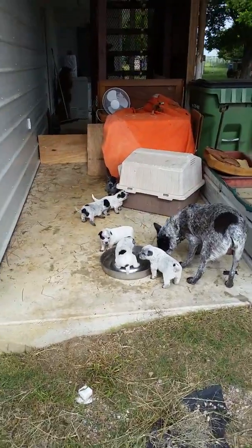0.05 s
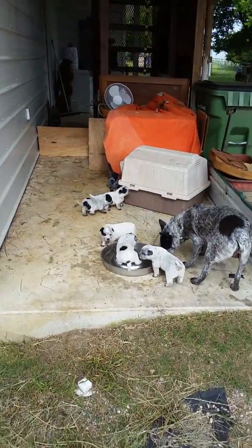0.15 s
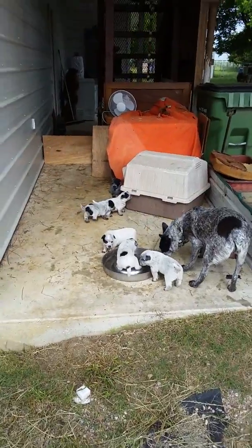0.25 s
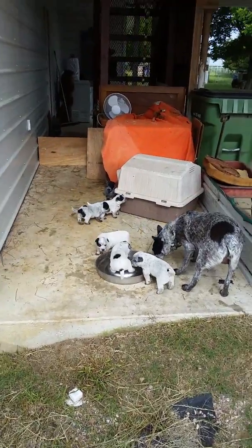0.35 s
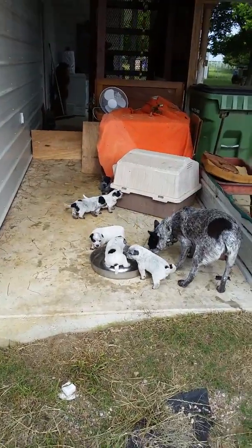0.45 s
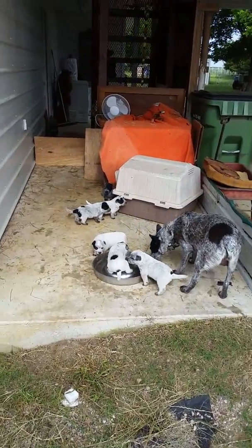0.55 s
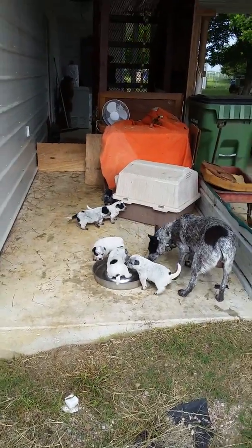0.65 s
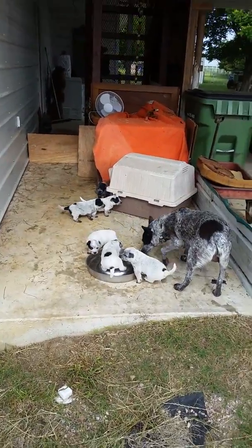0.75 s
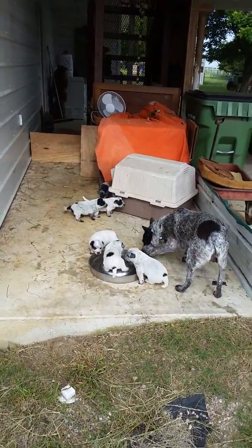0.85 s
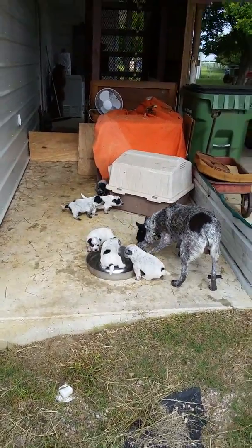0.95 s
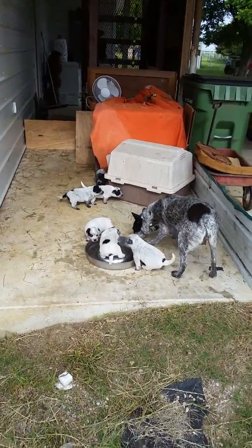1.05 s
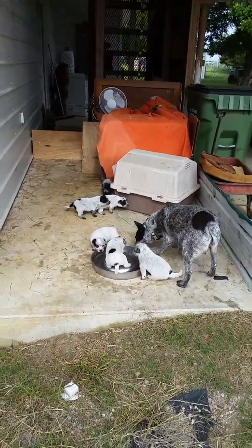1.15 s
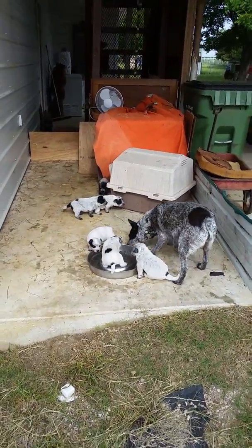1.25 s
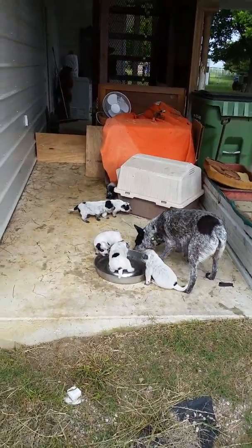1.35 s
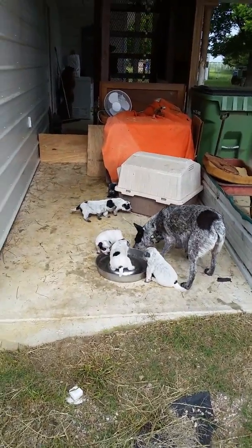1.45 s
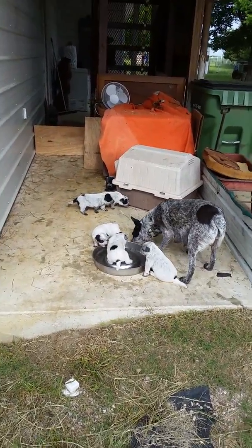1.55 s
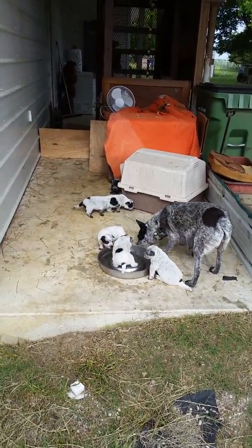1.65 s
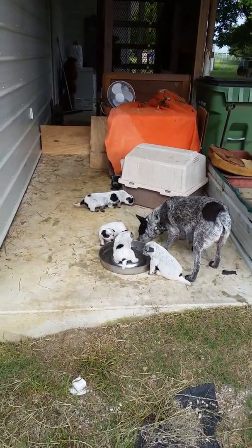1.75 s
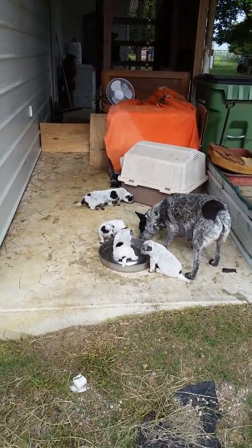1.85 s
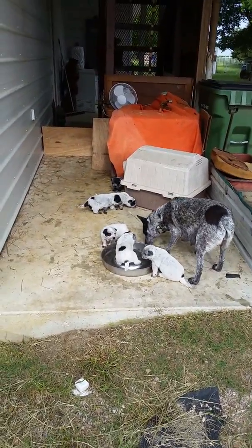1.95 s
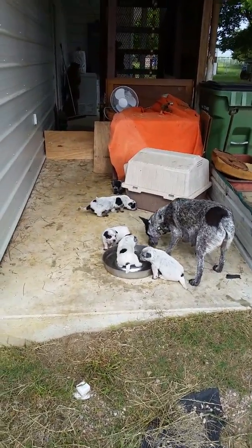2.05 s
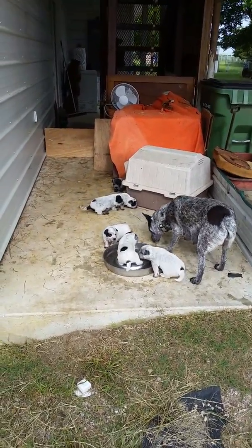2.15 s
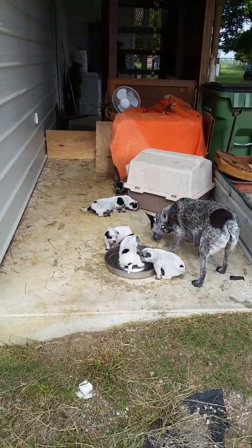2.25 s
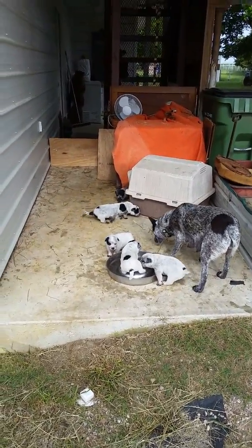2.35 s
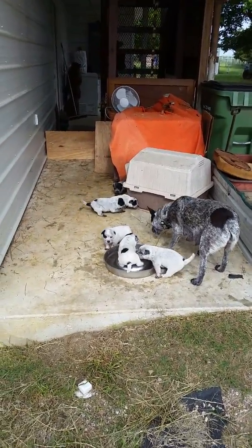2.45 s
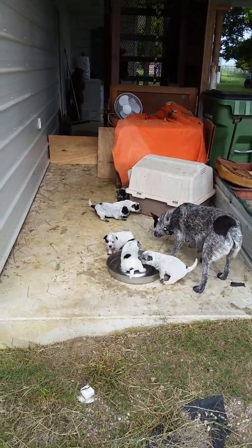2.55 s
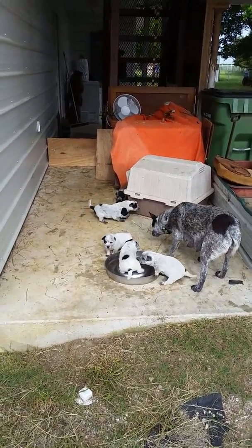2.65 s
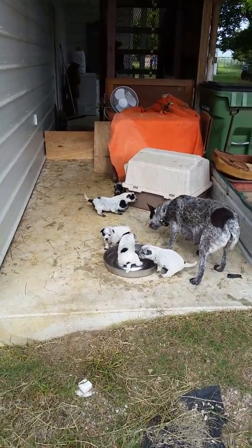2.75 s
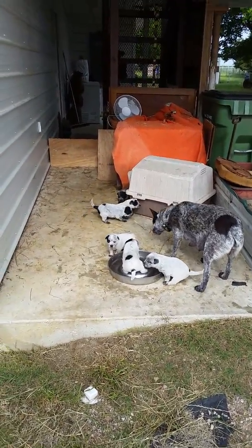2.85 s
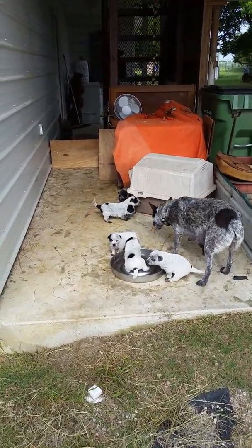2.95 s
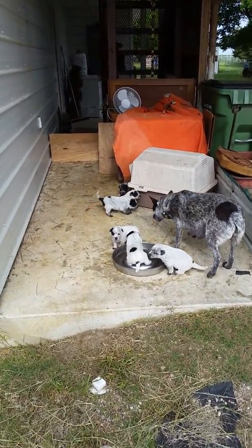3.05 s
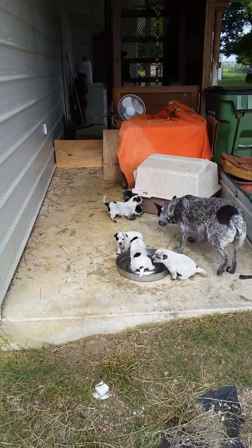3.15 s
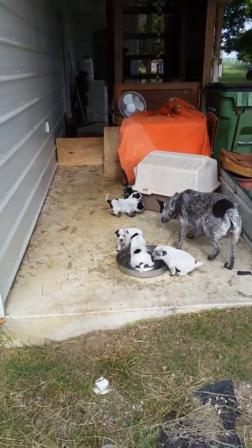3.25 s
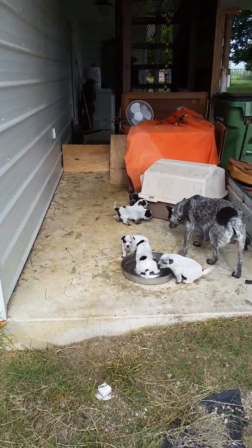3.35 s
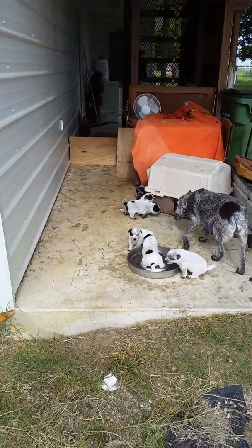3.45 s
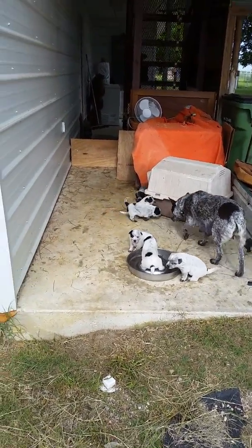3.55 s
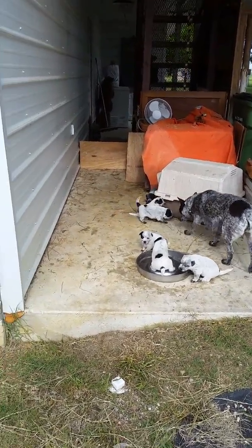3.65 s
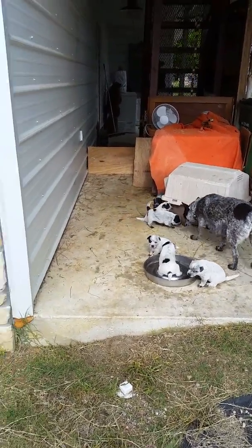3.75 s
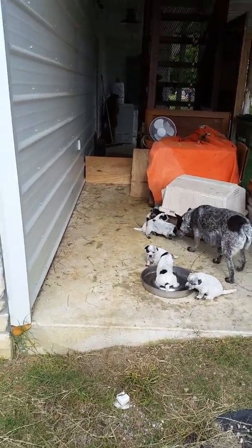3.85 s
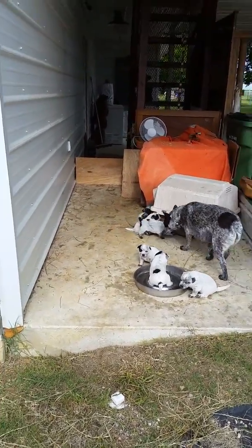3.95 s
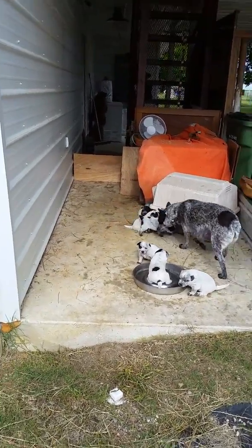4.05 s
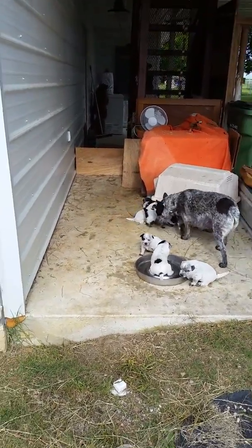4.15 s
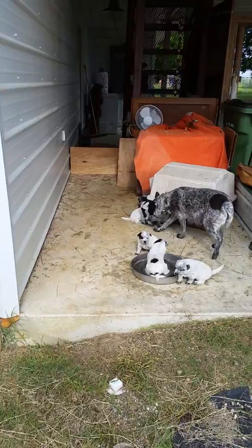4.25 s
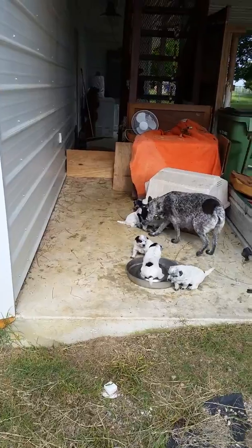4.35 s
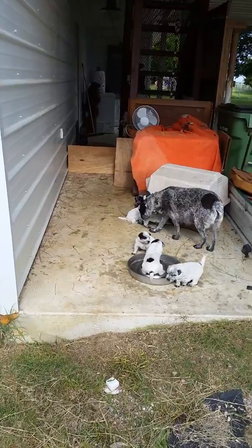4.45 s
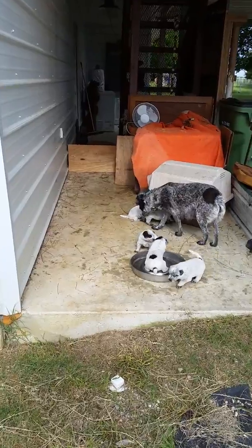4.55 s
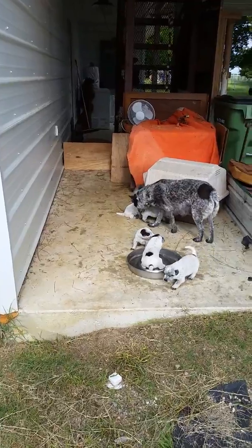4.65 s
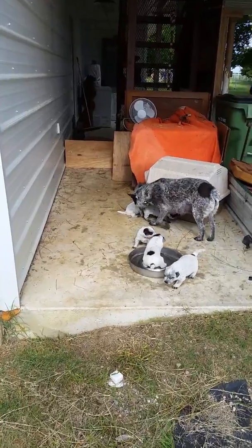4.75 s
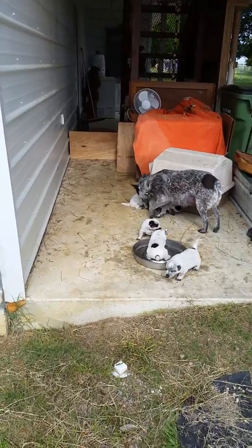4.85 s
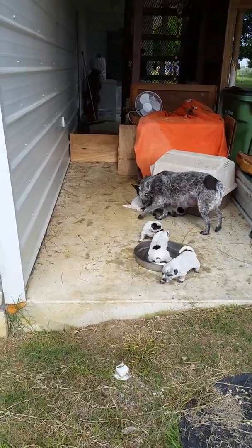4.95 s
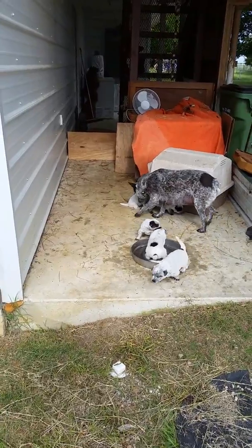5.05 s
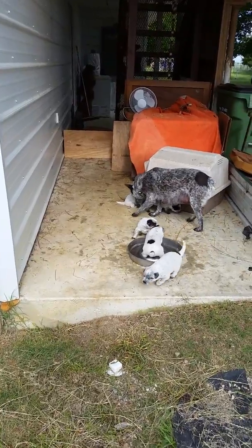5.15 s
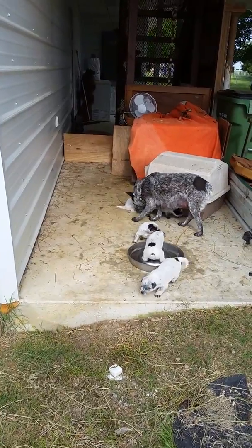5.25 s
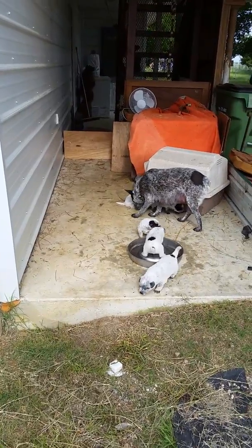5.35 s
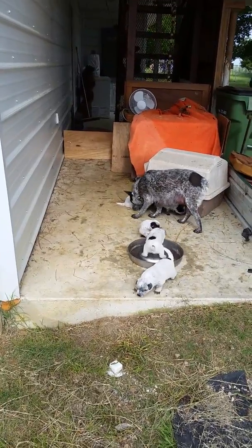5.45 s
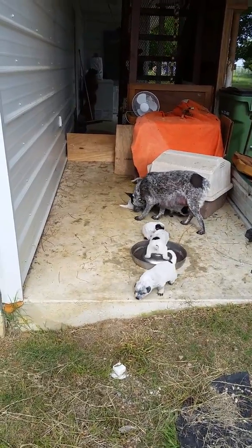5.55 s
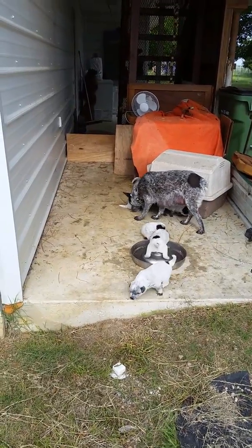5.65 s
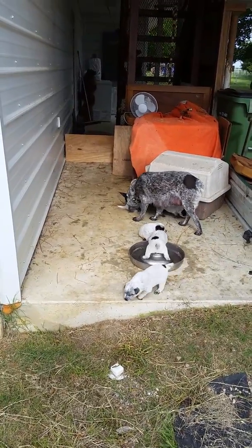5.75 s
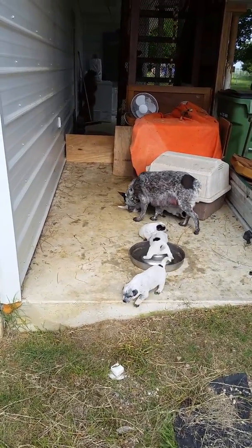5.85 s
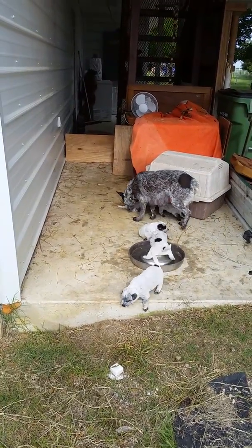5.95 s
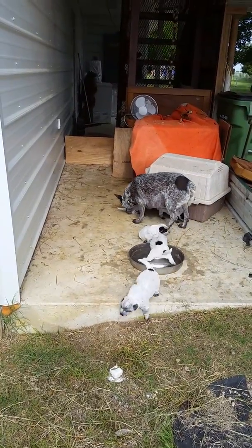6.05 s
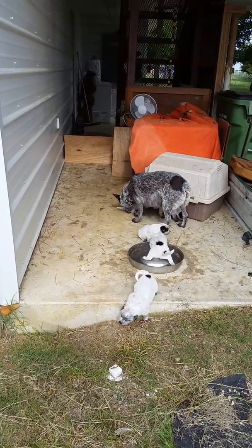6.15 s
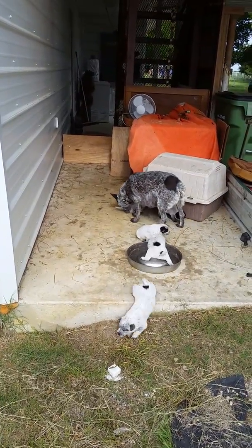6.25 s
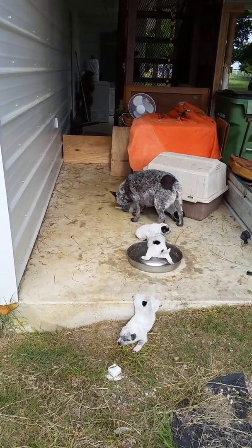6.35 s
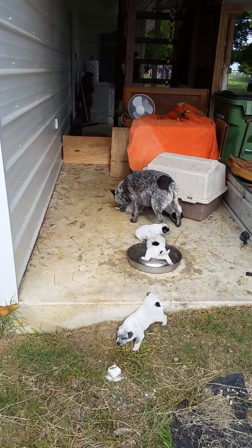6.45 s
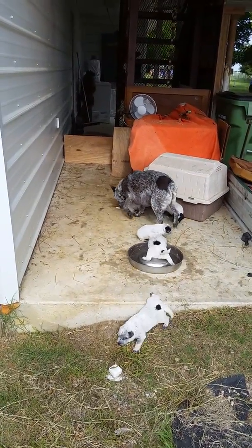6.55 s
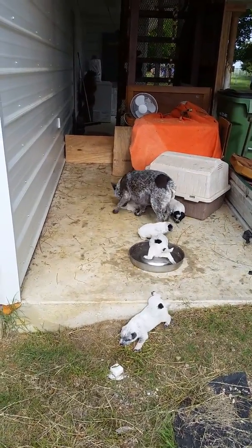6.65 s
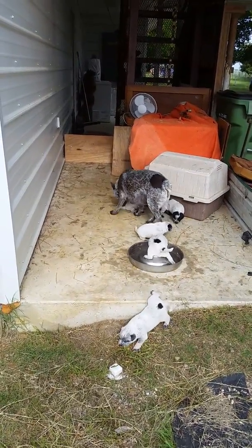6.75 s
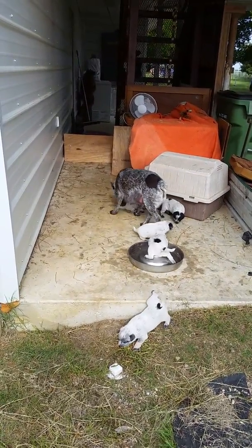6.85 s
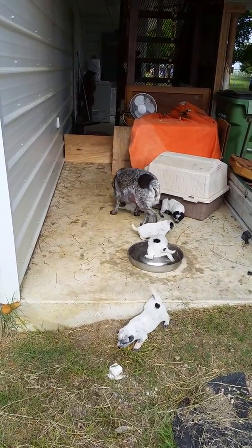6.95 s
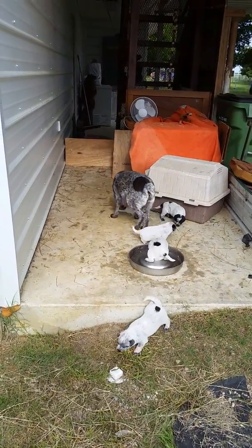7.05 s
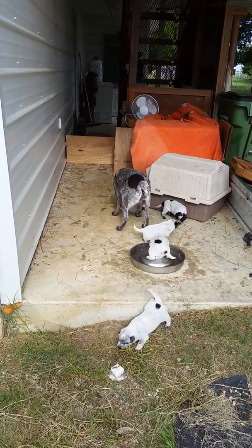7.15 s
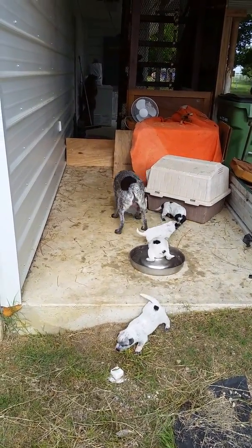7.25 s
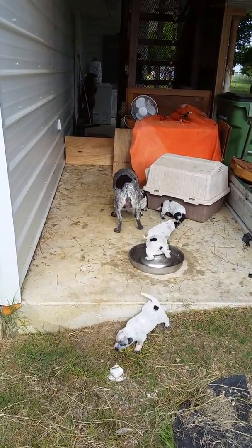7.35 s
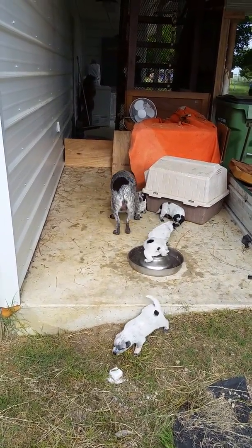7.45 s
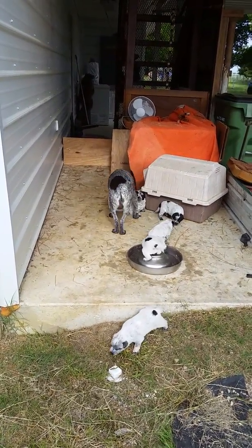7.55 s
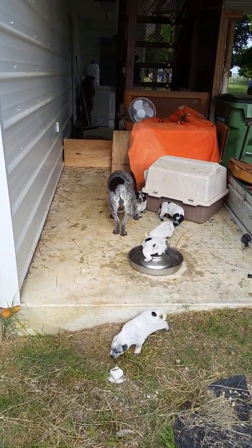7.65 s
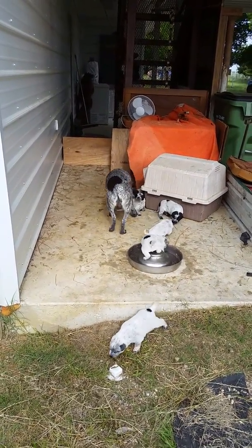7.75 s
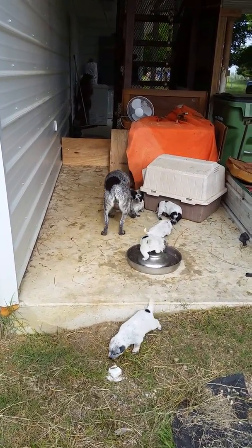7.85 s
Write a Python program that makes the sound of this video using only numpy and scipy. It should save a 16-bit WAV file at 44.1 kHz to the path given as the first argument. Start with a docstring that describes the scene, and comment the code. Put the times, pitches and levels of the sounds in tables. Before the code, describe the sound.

Quiet breeze and faint microphone ticks open the scene, with a raspy bird chirp outside. A puppy whistles thinly, breaking to a lower note, then whimpers repeatedly in short nasal cries. Around the middle, fingers slip across the handheld microphone in a dull, accelerating rub. Afterwards come tiny grunts, faint distant bird slurs, low murmurs of a pan under paws, and one soft pan thud, with short shed echoes.

```python
"""Puppies and a pan in an open shed

Close by, puppies give a thin nasal whistle, arching whimpers and small grunts, all built of gliding harmonics,
and a metal pan bumps softly as decaying low modes. Outside, birds chirp as shaky tones in a light breeze of
coloured noise. The hand on the microphone makes its case tick by short pulses, then slips across it in a loud
juddering rub of pulse trains and friction noise. The right port is shaded and hears little treble through the air.
"""
import sys
import numpy as np
from scipy import signal
from scipy.fft import rfft, irfft, next_fast_len
from scipy.io import wavfile
from scipy.ndimage import uniform_filter1d

SR = 44100
rng = np.random.default_rng(int(sys.argv[2]) if len(sys.argv) > 2 else 0)


def inscribe(sig):
    """Save sig as 16-bit PCM at rate SR to the path in sys.argv[1].

    A 1-D sig is mono; a 2-D sig holds one channel per row.
    Samples are clipped to [-1, 1] before scaling.
    """
    pcm = np.round(np.clip(np.atleast_2d(sig).T, -1, 1) * 32767)
    wavfile.write(sys.argv[1], SR, pcm.astype(np.int16))


N = 348037
TIME = np.arange(N) / SR
CUTOFF_HZ = 15900

# Moving air at the ports, rustling leaves, and a far hiss round 5 kHz that rises and falls with the rush.
# Each row: frequency in Hz, level in dB.
AIR_COLOUR = [(15, -49), (25, -7.5), (54, -3.5), (98, -4.5), (199, -13), (233, -11.5), (284, -11.5),
              (366, -3.5), (493, -9), (589, -13), (856, -17.5), (964, -33), (1270, -16.5), (1780, -26),
              (2800, -38.5), (3640, -68.5), (6160, -120)]
LEAF_COLOUR = [(2000, -2), (2700, -4), (3600, -14.5), (4500, 1.5), (5600, -5), (6700, 4.5), (7400, -9),
               (8200, -39), (10500, -26), (12000, -12.5), (15500, -13.5)]
HISS_COLOUR = [(3000, -17), (4000, -16.5), (4600, -3.5), (5000, -2.5), (5600, -13.5), (6500, -31.5)]
# Swells of the background: rush, low buffeting and rustle rise and fall together. Each row: centre in seconds,
# half-width in seconds (to 1/e), lift of the rush in dB, lift of the low buffeting in dB, lift of the rustle in dB.
SWELLS = [(0.03, 0.21, 7, 3.5, 0), (0.36, 0.13, 5, 1.5, 7.5), (1.1, 0.15, 5, 2, 1.5),
          (1.82, 0.27, 10.5, 5.5, 5.5), (2.7, 0.33, 4, 2.5, 8), (3.851, 0.85, 9, 4, 11.5),
          (4.9, 0.52, 9.5, 6.5, 20.5), (5.95, 0.28, 4, 5, 14), (6.54, 0.25, 7.5, 8.5, 14),
          (6.85, 0.16, 9.5, 8.5, 11), (7.21, .2, 6.5, 7, 11.5)]
# Right port against the left, for the breeze and for other sound through the air. Each row: Hz, gain in dB.
BREEZE_RIGHT_PORT = [(60, 0.5), (300, 6.5), (800, -7.5), (1400, -12.5), (2500, -7.5), (4700, -18.5),
                     (6700, -20.5), (8500, -2), (14000, -4)]
AIRBORNE_RIGHT_PORT = [(200, -5), (900, -6), (2000, -10), (3500, -12), (4500, -33), (6000, -36),
                       (8500, -28.5), (12000, -13), (15000, -10.5)]

# Strokes of the finger across the case, a light one and then the long rub. Each row: full pressure reached
# in seconds, hold in seconds, judder in dB, friction in dB.
STROKES = [(0.003, 0.093, -78, -61), (4.554, .005, -38, -50), (4.707, 0.0087, -20.5, -23.5),
           (4.793, 0.04, -18, -23), (4.858, .03, -33, -34), (4.927, 0.012, -45, -37.5)]
PRESS_DB_PER_S, LIFT_DB_PER_S = 242, 456   # each stroke builds up and lets go
BRUSH_DB, BRUSH_FADE_DB_PER_S = -21, 82   # the skin still brushes the case after a stroke
# The finger gathers speed: start and end of the change in seconds; slips per second before and after it.
SPEED_UP_S = (4.66, 4.82)
SLIPS_PER_S = (62, 370)
# Friction through the case, and the fine hiss of skin each port picks up by itself. Each row: Hz, level in dB.
FRICTION_COLOUR = [(30, -14), (110, 10), (330, 1), (520, 15.5), (740, -0.5), (900, 2), (1200, -8.5),
                   (1500, -14), (1950, -24.5), (2300, -39.5), (4000, -42.5), (8000, -67)]
SKIN_COLOUR = [(100, 6.5), (1200, 3.5), (2000, -14.5), (2500, -17.5), (4000, -22.5), (6700, -28.5),
               (8200, -67), (10500, -47.5), (12000, -38.5), (15500, -39)]
# Left port against the right, for sound through the case. Each row: frequency in Hz, gain in dB.
CASE_LEFT_PORT = [(60, -6), (150, -14.5), (300, -8.5), (700, -0.5), (1290, 3.5), (2400, -17.5), (5000, 7),
                  (15000, -6.5)]
PORT_LAG_S = .0009

# Slips of the finger on the case, light ticks of the case, and dull low buffets leaning to one port or the other.
# Each row: time in seconds, strength in dB, left-over-right lean in dB (ahead of the left port's own response).
SLIPS = [(0.335, -40.5, -6.5), (1.037, -34.5, -2), (3.52, -28.5, -1.5), (3.758, -38.5, -6), (3.809, -36, 0),
         (3.9, -34.5, -3.5), (3.917, -31, -4.5), (4.166, -29, -6), (4.249, -20.5, -9), (4.274, -25, -6.5),
         (4.369, -23, -16.5), (4.382, -17.5, -1), (4.523, -22, 0.5), (4.62, -13.5, 4.5), (4.642, -11, 2),
         (4.665, -18.5, -3.5), (4.734, -16, -11), (4.84, -17, -18), (6.825, -36, -4), (6.859, -34.5, -1)]
TICKS = [(0.401, -45, -3.5), (0.573, -40, -1.5), (0.878, -48, -2.5), (1.016, -43.5, -3), (1.194, -45, -9),
         (1.256, -50, -9), (1.349, -47.5, -3.5), (1.487, -44.5, -1.5), (1.661, -39, 0), (1.816, -46, -2),
         (2.41, -47, -2.5), (2.551, -49, 0), (3.949, -30.5, -10.5)]
BUFFETS = [(3.519, -35, 14.5), (4.686, -28, -20), (6.152, -41, -7), (6.293, -39.5, 7), (6.425, -38.5, -9),
           (6.46, -43.5, 5), (6.502, -36.5, 8), (6.575, -46.5, 21), (6.675, -41, -10), (6.762, -40, 7)]
# Their colours. Each row: frequency in Hz, level in dB.
SLIP_COLOUR = [(25, -19), (70, 4.5), (140, 12.5), (320, 8), (550, 0), (800, -18), (1250, -31),
               (1550, -22.5), (2000, -62), (3500, -57), (9000, -77)]
TICK_COLOUR = [(30, -78.5), (120, 24), (300, 19.5), (600, 21), (900, -7.5), (1300, -1.5), (1800, -0.5),
               (3000, -51), (8000, -86)]
BUFFET_COLOUR = [(20, -10.5), (55, 8), (100, 3), (160, -7.5), (300, -19), (1000, -60), (4000, -86.5)]

# A bird's harsh falling chirp. Each row: start in seconds, level in dB.
CHIRPS = [(0.955, -51.5), (2.552, -52.5), (4.296, -46), (6.763, -48)]
# Course of one chirp. Each row: seconds after its start, pitch in Hz, relative level in dB.
CHIRP_COURSE = [(0, 4800, -26.5), (0.016, 4527, -9.5), (.04, 3923, -7), (0.058, 3422, -4.5),
                (.085, 3200, -7.5), (.102, 3006, -11), (0.113, 2634, -17.5)]
# Rasping strands of a chirp. Each row: multiple of the pitch, relative level in dB.
CHIRP_STRANDS = [(0.998, 0), (1.15, -4), (1.361, -7.5), (1.598, -19.5)]
# Far bird slurs. Each row: start, crest and end in seconds, start, crest and end pitch in Hz, level in dB.
SLURS = [ (5.68, 5.887, 5.94, 2255, 3060, 3020, -73), (6.04, 6.087, 6.12, 2500, 2620, 2600, -81),
         (6.26, 6.343, 6.37, 2415, 2670, 2570, -75.5), (6.358, 6.375, 6.41, 1790, 1820, 1765, -71.5),
         (6.48, 6.571, 6.62, 2460, 2630, 2560, -76.5)]
SHED_T60_S = .52

# The thin nasal whistle, which breaks to a lower note. Each row: time in seconds, pitch in Hz, level in dB.
WHISTLE = [(1.419, 6230, -79), (1.469, 6080, -52), (1.52, 6117, -41), (1.612, 5970, -34.5),
           (1.747, 6055, -35), (1.758, 5570, -62), (1.778, 5010, -44.5), (1.915, 5023, -41.5),
           (1.945, 4770, -67)]
# Relative levels of its first three harmonics in dB.
WHISTLE_PARTIALS_DB = [-6, -37, -31]
# One very high squeak. Start, crest and end in seconds, start, crest and end pitch in Hz, level in dB.
# The crest lies far ahead of the start, so only the last of the fall from it is heard.
SQUEAK = (4.335, 2, 4.5, 13106.5, 14329, 14028, -58)
# Arches of pitch in the whimpers; a whimper with two swells takes two rows. Each row: start, crest and end
# in seconds, start, crest and end pitch in Hz, level in dB, level of the nasal overtones in dB.
WHIMPER_ARCHES = [ (2.105, 2.154, 2.175, 1836, 2073, 1795, -60, -80),
                  (2.342, 2.39, 2.412, 1893, 2066, 2280, -59, -64.5),
                  (2.418, 2.449, 2.476, 2400, 2460, 1780, -55.5, -61),
                  (2.67, 2.793, 2.82, 1961, 2312, 1740, -47, -51),
                  (2.992, 3.041, 3.172, 1780, 1997, 1808, -46.5, -60),
                  (3.361, 3.402, 3.605, 1627, 1862, 1357, -53, -59.5),
                  (3.785, 3.843, 3.965, 1161, 1360, 1065, -57, -58),
                  (3.957, 3.99, 4.06, 1074, 1142, 1090, -56.5, -59),
                  (4.424, 4.437, 4.455, 1820, 1870, 1860, -58.5, -66)]
# Small grunts. Each row: start, crest and end in seconds, start, crest and end pitch in Hz, level in dB.
GRUNTS = [ (5.046, 5.092, 5.105, 812, 1323, 1350, -55.5), (5.129, 5.151, 5.175, 1120, 1040, 1130, -61),
          (5.392, 5.402, 5.425, 1000, 1018, 938, -63.5), (5.598, 5.64, 5.65, 1007, 965, 1000, -71.5)]
# A puppy's throat and nose, and a throat without colour. Each row: frequency in Hz, gain in dB.
THROAT = [(900, -3), (1250, -12), (1500, -5), (2100, -5), (2700, -22.5), (3300, -39.5), (3950, -20),
          (4400, -19), (5600, -4.5), (6600, -5.5), (7400, -15), (8300, -57), (10000, -43.5), (15000, -24.5),
          (15600, -20)]
FLAT = [(100, 0), (16000, 0)]
GLIDE_S = .014   # a throat rounds the corners of its pitch over this time
CRACK_S = .016   # the pitch of a whimper's arch collapses over its last moment
CLAWS_PER_S, CLAWS_DB = 6.4, -67

# Hollow bumps of the pan on the floor. Each row: time in seconds, strength in dB, ring in Hz, t60 in seconds.
BUMPS = [(2.235, -35.5, 231.5, 0.13), (2.254, -40, 152, 0.26), (7.158, -25.5, 129, 0.072),
         (7.17, -47, 226, 0.1)]
# Low modes of the pan, stirred by a puppy's paws. Each row: frequency in Hz, width in Hz, level in dB.
PAN_MODES = [(135, 6.7, -67.5), (229, 11.7, -65.5)]
PADDLE_AT_S, PADDLE_HALF_S = 6.66, 0.97   # when the puppy treads most, and the half-width (to 1/e)


def from_db(db):
    """Decibels to gain."""
    return 10 ** (np.asarray(db) / 20)


def rms_one(x):
    """Scale to unit rms."""
    return x / np.sqrt(np.mean(x ** 2) + 1e-20)


def in_time(rows, t=TIME):
    """The columns of a curve table at times t."""
    s, *columns = np.transpose(rows)
    return [np.interp(t, s, column) for column in columns]


def at_hz(points, hz):
    """A spectrum table read on a log-frequency axis."""
    f, level = np.transpose(points)
    return np.interp(np.log(np.maximum(hz, 1)), np.log(f), level)


def colour(x, points):
    """Causal (minimum-phase) filter with the given spectrum, made by folding the cepstrum."""
    size = 8192
    hz = np.arange(size // 2 + 1) * SR / size
    cepstrum = irfft(np.log(from_db(at_hz(points, hz))))
    cepstrum[1:size // 2] *= 2
    cepstrum[size // 2 + 1:] = 0
    response = irfft(np.exp(rfft(cepstrum)))
    return signal.oaconvolve(x, response)[:len(x)]


def noise(points):
    """Coloured noise of unit rms."""
    return rms_one(colour(rng.standard_normal(N), points))


def drift(rate, t=TIME):
    """Random wander round zero, joining about unit-spread values drawn `rate` times a second."""
    knots = rng.standard_normal(16384)
    return np.interp((t - t[0]) * rate, np.arange(len(knots)), knots)


def swell(at_s, half_s):
    """A smooth hump of height 1 in time."""
    return np.exp(-((TIME - at_s) / half_s) ** 2)


def breeze(buffet_db=-62, rush_db=-70.0, rustle_db=-82, hiss_db=-78, hiss_follows=0.83, lumps_db=3, shared=0.66):
    """Lumpy buffeting at the ports, a soft rush, rustling leaves and a far hiss, all lifted by the swells."""
    lift_db, low_db, leaves_db = sum(np.outer(db, swell(s, half_s)) for s, half_s, *db in SWELLS)
    low_pass = signal.butter(2, 250, fs=SR, output="sos")
    high_pass = signal.butter(2, 250, "high", fs=SR, output="sos")
    common = noise(AIR_COLOUR)
    ports = []
    for port in range(2):
        air = np.sqrt(shared) * common + np.sqrt(1 - shared) * noise(AIR_COLOUR)
        lumpy = signal.sosfilt(low_pass, air) * from_db(lumps_db * drift(35))
        buffet = rms_one(lumpy) * from_db(buffet_db + low_db)
        rush = rms_one(signal.sosfilt(high_pass, air)) * from_db(rush_db + lift_db)
        rustle = noise(LEAF_COLOUR) * from_db(rustle_db + leaves_db + 2 * drift(60))
        hiss = noise(HISS_COLOUR) * from_db(hiss_db + hiss_follows * lift_db)
        ports.append(buffet + rush + rustle + hiss)
    left, right = ports
    return np.array([left, colour(right, BREEZE_RIGHT_PORT)])


def to_left_port(x):
    """Vibration of the case reaches the left port later and with less bass."""
    size = next_fast_len(N)
    hz = np.arange(size // 2 + 1) * SR / size
    lag = np.exp(-2j * np.pi * hz * PORT_LAG_S)
    return irfft(rfft(x, size) * from_db(at_hz(CASE_LEFT_PORT, hz)) * lag, size)[:N]


def pressure():
    """Judder and friction gains of the strokes: each builds up, holds and lets go, leaving a light brush."""
    judder, friction = np.zeros((2, N))
    for s, hold_s, judder_db, friction_db in STROKES:
        before, after = np.maximum(s - TIME, 0), np.maximum(TIME - s - hold_s, 0)
        pressed_db = -PRESS_DB_PER_S * before - LIFT_DB_PER_S * after
        brushed_db = BRUSH_DB - PRESS_DB_PER_S * before - BRUSH_FADE_DB_PER_S * after
        judder = np.maximum(judder, from_db(judder_db + pressed_db))
        friction = np.maximum(friction, from_db(friction_db + np.maximum(pressed_db, brushed_db)))
    return judder, friction


def rub(unevenness=0.2046, slip_spread_db=2.5, grain_db=3.0, skin_db=-13, left_skin_db=4, rasp_db=-23,
        rasp_hz=1850):
    """Stick-slip speeds up into a judder, over the grainy friction of skin on the case."""
    shake, friction = pressure()
    per_s = np.exp(np.interp(TIME, SPEED_UP_S, np.log(SLIPS_PER_S)))
    # One pulse each time the uneven slip count passes a whole number; faster slips are smaller.
    turns = np.floor(np.cumsum(per_s * (1 + unevenness * drift(200))) / SR)
    slips = np.diff(turns, prepend=0) * from_db(slip_spread_db * drift(300)) / np.sqrt(per_s)
    no_rumble = signal.butter(2, 60, "high", fs=SR, output="sos")
    judder = rms_one(signal.sosfilt(no_rumble, colour(slips, SLIP_COLOUR)))
    grip = friction * from_db(grain_db * drift(250))
    rasp_band = signal.butter(2, [rasp_hz / 1.32, rasp_hz * 1.05], "band", fs=SR, output="sos")
    rasp = rms_one(signal.sosfilt(rasp_band, rng.standard_normal(N)))
    speed = per_s / per_s.max()   # a faster finger rasps more
    case = shake * judder + grip * (noise(FRICTION_COLOUR) + speed * from_db(rasp_db) * rasp)
    skin = [from_db(skin_db + port_db) * grip * noise(SKIN_COLOUR) for port_db in (left_skin_db, 0)]
    return np.array([to_left_port(case), case]) + skin


def knocks(rows, points, left_db, rise_s, soft_s=0):
    """Each jerk is one dull pulse at both ports; the weaker it is, the softer its edge (up to soft_s)."""
    height = np.abs(colour(signal.unit_impulse(SR), points)).max()
    strengths = np.transpose(rows)[1]
    left, right = np.zeros((2, N))
    near = np.arange(-64, 65)   # samples round the peak
    for s, peak_db, lean_db in rows:
        weakness = (strengths.max() - peak_db) / np.ptp(strengths)
        pulse = np.exp(-(near / (1 + SR * soft_s * weakness ** 2)) ** 2)
        pulse /= pulse.sum()
        at = round((s + rise_s) * SR) + near
        left[at] += pulse * from_db(peak_db + lean_db / 2 + left_db)
        right[at] += pulse * from_db(peak_db - lean_db / 2)
    return np.array([to_left_port(colour(left, points)), colour(right, points)]) / height


def handling():
    """Slips, ticks and low buffets; the ticks push with the opposite polarity."""
    slips = knocks(SLIPS, SLIP_COLOUR, left_db=7.0, rise_s=0.0011, soft_s=0.00071)
    ticks = knocks(TICKS, TICK_COLOUR, left_db=11.0, rise_s=0.00107)
    buffets = knocks(BUFFETS, BUFFET_COLOUR, left_db=8.5, rise_s=0.00024)
    return slips - ticks + buffets


def shed(x, wet_db, early_db=6, early_s=0.07):
    """Direct sound, a dense burst of echoes from the near walls and a thin tail, different at each port."""
    t = TIME[:SR]
    fading = from_db(-60 * t / SHED_T60_S) + from_db(early_db) * np.exp(-t / early_s)
    tails = rng.standard_normal((2, SR)) * fading * (t > .004)
    ports = []
    for tail in tails:
        echo = signal.oaconvolve(x, rms_one(tail) / np.sqrt(SR))[:N]
        ports.append(x + from_db(wet_db) * echo)
    return np.array(ports)


def span(rows, fade_s=0.0028):
    """Sample indices, times and soft-edged gate of one call."""
    at = np.arange(int((rows[0][0] - fade_s) * SR), int((rows[-1][0] + fade_s) * SR))
    t = at / SR
    from_edge = np.minimum(t - t[0], t[-1] - t)
    return at, t, np.sin(np.pi / 2 * np.clip(from_edge / (2 * fade_s), 0, 1)) ** 2


def arch(row, attack_share, attack_db, release_db, effort_db_per_octave=0, closing_db=0, waver=0, crack=0):
    """One arch as rows of s, Hz, dB, brightness dB: pitch glides by way of a crest, level swells and may follow it."""
    times, pitches, level_db = row[:3], row[3:6], row[6]
    nasal_db = row[-1]   # the level itself, where a row has no overtone column
    t = np.arange(times[0], times[2], 1 / SR)
    hz = uniform_filter1d(np.interp(t, times, pitches), max(int(GLIDE_S * SR), 1), mode="nearest")
    course = np.linspace(0, 1, len(t))
    stages = [0, np.clip(attack_share, .05, .75), .8, 1]
    envelope_db = np.interp(course, stages, [attack_db, 0, 0, release_db])
    effort_db = level_db + effort_db_per_octave * np.log2(hz / pitches[1])
    left_s = t[-1] - t
    bright_db = nasal_db - effort_db + closing_db * np.clip(1 - left_s / (2 * CRACK_S), 0, 1)
    collapse = crack * np.clip(1 - left_s / CRACK_S, 0, 1)
    return np.transpose([t, hz * (1 + waver * drift(70, t) - collapse), envelope_db + effort_db, bright_db])


def calls(tables, partials_db, throat, jitter, shimmer_db, rasp=0):
    """Gliding tones with a trembling pitch, shaped by a throat; rasp blurs the upper harmonics most."""
    out = np.zeros(N)
    for rows in tables:
        at, t, gate = span(rows)
        hz, level_db, bright_db = in_time(rows, t)
        hz = hz * (1 + jitter * drift(223.4, t))
        phase = 2 * np.pi * np.cumsum(hz) / SR + rasp * drift(900, t)
        for k, partial_db in enumerate(partials_db, 1):
            nasal = np.clip((k * hz - 2800) / 2000, 0, 1)   # share of the brightness, full from 4800 Hz
            gain_db = level_db + partial_db + at_hz(throat, k * hz) + nasal * bright_db
            gain = from_db(gain_db + shimmer_db * drift(116.7, t)) * (k * hz < CUTOFF_HZ)
            out[at] += np.sqrt(2) * gate * gain * np.sin(k * phase)
    return out


def chirps(rasp=0.074, flutter_db=5):
    """The pitch shakes fast as it falls, which smears each chirp into rasping strands."""
    out = np.zeros(N)
    for start, chirp_db in CHIRPS:
        rows = np.array(CHIRP_COURSE) + [start, 0, chirp_db]
        at, t, gate = span(rows)
        hz, level_db = in_time(rows, t)
        for multiple, strand_db in CHIRP_STRANDS:
            shaken_hz = multiple * hz * (1 + rasp * drift(1300, t))
            phase = 2 * np.pi * np.cumsum(shaken_hz) / SR
            out[at] += gate * from_db(level_db + strand_db + flutter_db * drift(250, t)) * np.sin(phase)
    return out


def birds():
    """Harsh chirps and far slurs of one gliding partial come in from outside, with the echo of the shed."""
    arches = [arch(row, attack_share=0.64, attack_db=-17, release_db=-5) for row in SLURS]
    slurs = calls(arches, [0], FLAT, jitter=0.017, shimmer_db=5.5)
    return shed(chirps(), wet_db=-3.5, early_s=0.015) + shed(slurs, wet_db=1.0)


def claws(spread_db=4, tick_s=.002):
    """Tiny claws tick on the concrete: faint scratchy bursts of fading noise, at random."""
    sizes = from_db(spread_db * np.minimum(rng.standard_normal(N), 2))
    touches = (rng.random(N) < CLAWS_PER_S / SR) * sizes
    fading = signal.lfilter([1], [1, -np.exp(-1 / (tick_s * SR))], touches + 1e-18)
    return from_db(CLAWS_DB) * fading * noise(LEAF_COLOUR)


def whistles():
    """The nasal whistle and the squeak: few harmonics, with little tremble of the pitch."""
    squeak = arch(SQUEAK, attack_share=.6, attack_db=-13.5, release_db=-6.5)
    whistle = [(*point, 0) for point in WHISTLE]
    return calls([whistle, squeak], WHISTLE_PARTIALS_DB, FLAT, jitter=0.0029, shimmer_db=3.5, rasp=0.014)


def whimpers():
    """Eight harmonics through throat and nose; level follows pitch, and each arch cracks and dulls at its end."""
    arches = [arch(row, attack_share=0.28, attack_db=-8, release_db=1, effort_db_per_octave=13.5,
                   closing_db=-12, waver=0.015, crack=0.097) for row in WHIMPER_ARCHES]
    return calls(arches, np.zeros(8), THROAT, jitter=.008, shimmer_db=2.5, rasp=.07)


def grunts():
    """Short unsteady tones of one partial that die away at the end."""
    arches = [arch(row, attack_share=0.32, attack_db=-0.5, release_db=-16) for row in GRUNTS]
    return calls(arches, [-5], FLAT, jitter=0.038, shimmer_db=5.5)


def puppies():
    """Claws, whistle, squeak, whimpers and grunts, sounding in the shed."""
    return shed(claws() + whimpers() + grunts(), wet_db=-6.5) + shed(whistles(), wet_db=-2.5, early_s=0.024)


def bumps(swell_s=0.0066):
    """Each soft blow rings one low mode of the pan against the floor."""
    out = np.zeros(N)
    t = TIME[:SR // 2]
    for s, peak_db, hz, t60 in BUMPS:
        ring = (1 - np.exp(-t / swell_s)) * from_db(peak_db - 60 * t / t60) * np.sin(2 * np.pi * hz * t)
        at = int(s * SR)
        out[at:at + len(t)] += ring[:N - at]
    return out


def paddling(lumps_db=4):
    """Soft paws, as lumpy noise, keep the low modes of the pan murmuring."""
    tread = rng.standard_normal(N) * from_db(lumps_db * drift(12))
    rings = np.zeros(N)
    for hz, width, db in PAN_MODES:
        b, a = signal.iirpeak(hz, hz / width, fs=SR)
        rings += from_db(db) * rms_one(signal.lfilter(b, a, tread))
    return swell(PADDLE_AT_S, PADDLE_HALF_S) * rings


def scene():
    """Puppies and birds through the air, handling through the case, the pan and the breeze."""
    left, right = birds() + puppies()
    airborne = np.array([left, colour(right, AIRBORNE_RIGHT_PORT)])
    return breeze() + rub() + handling() + airborne + bumps() + paddling()


def record(dry):
    """A steep low-pass cuts the top."""
    return signal.sosfilt(signal.ellip(10, .1, 70, CUTOFF_HZ, fs=SR, output="sos"), dry)


dry = scene()
out = record(dry)
inscribe(out)
```